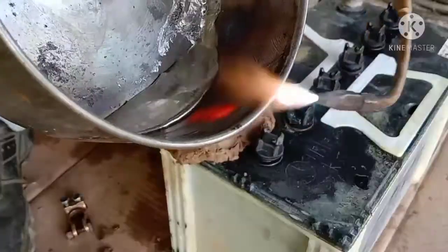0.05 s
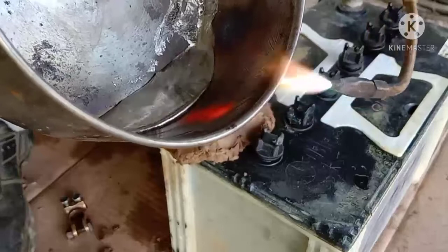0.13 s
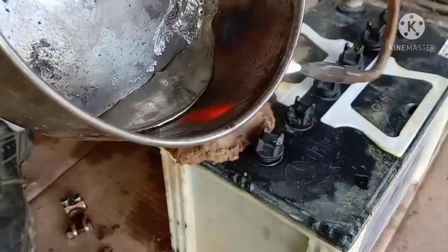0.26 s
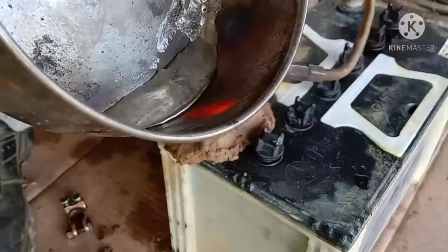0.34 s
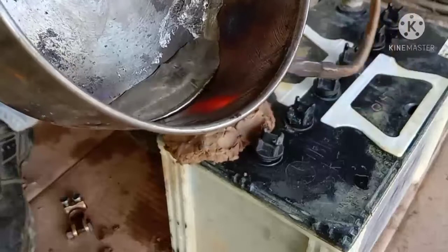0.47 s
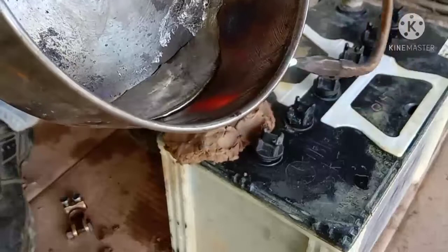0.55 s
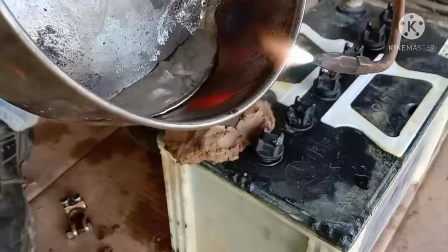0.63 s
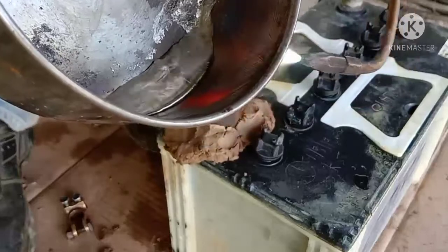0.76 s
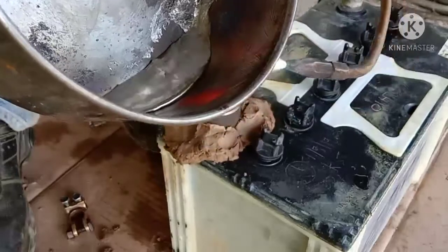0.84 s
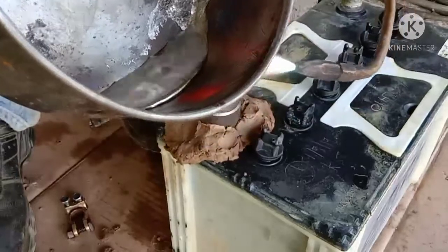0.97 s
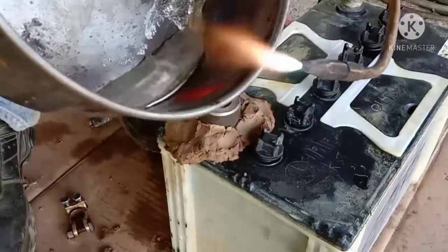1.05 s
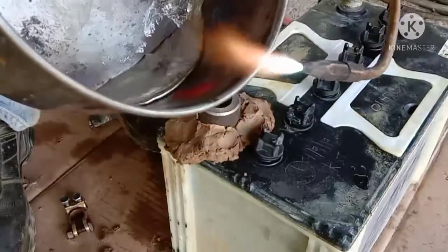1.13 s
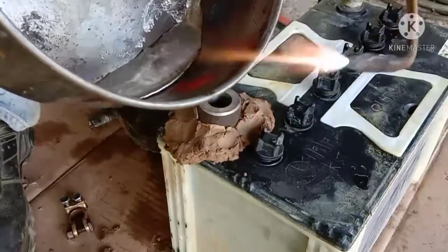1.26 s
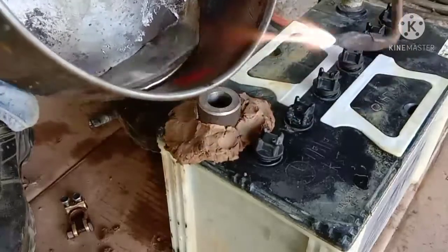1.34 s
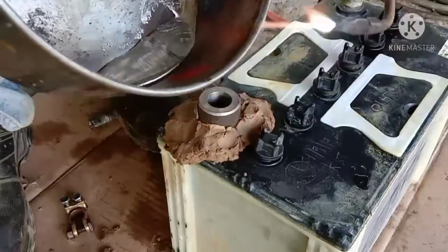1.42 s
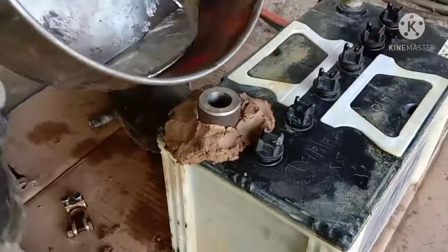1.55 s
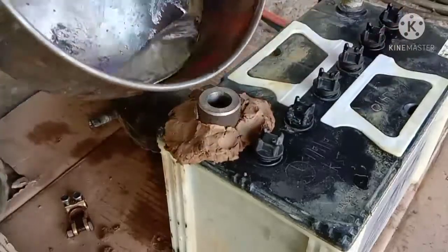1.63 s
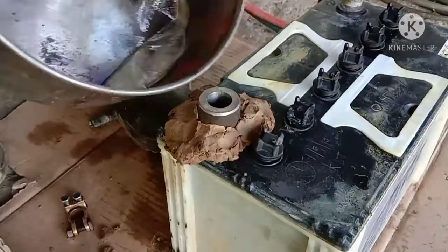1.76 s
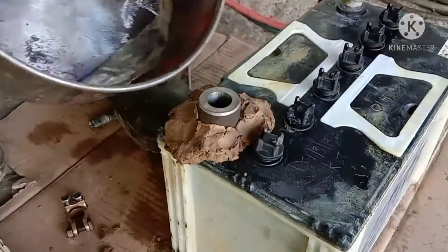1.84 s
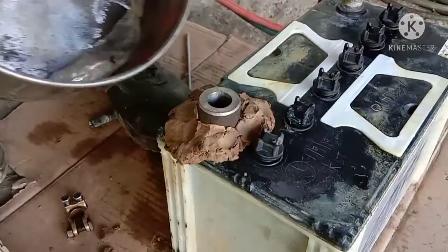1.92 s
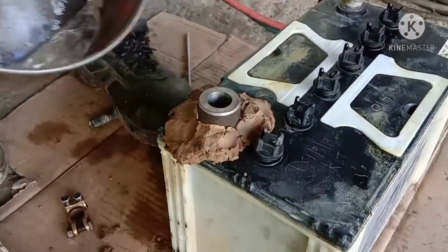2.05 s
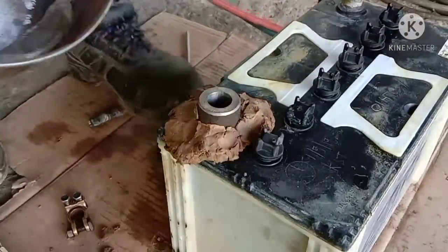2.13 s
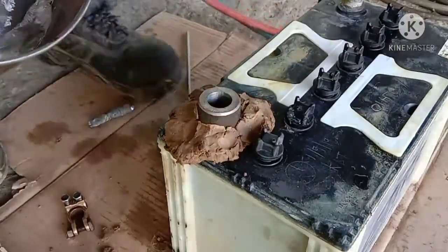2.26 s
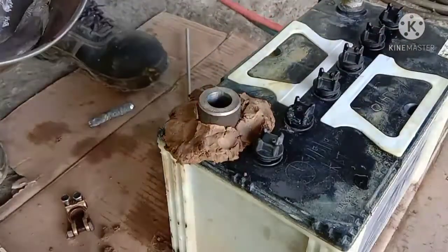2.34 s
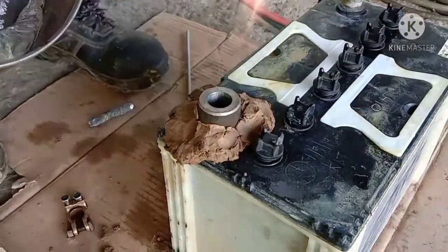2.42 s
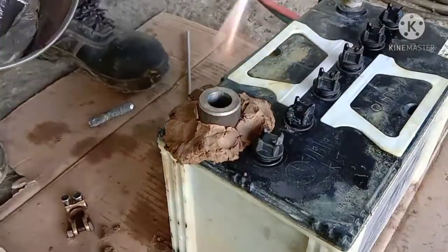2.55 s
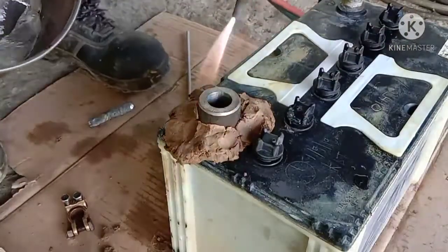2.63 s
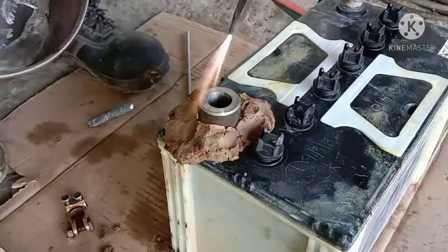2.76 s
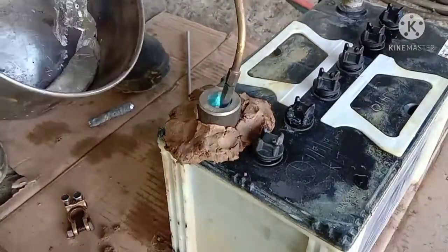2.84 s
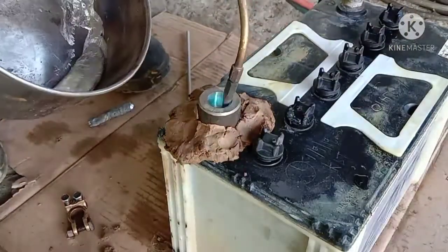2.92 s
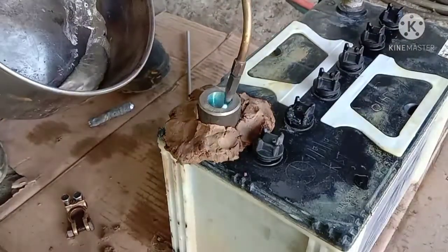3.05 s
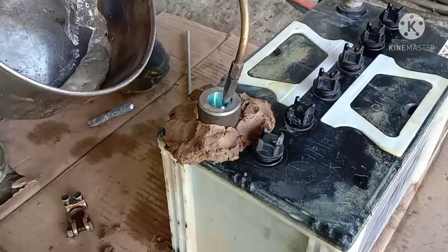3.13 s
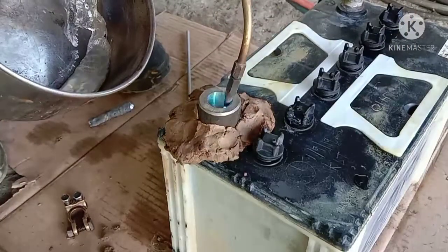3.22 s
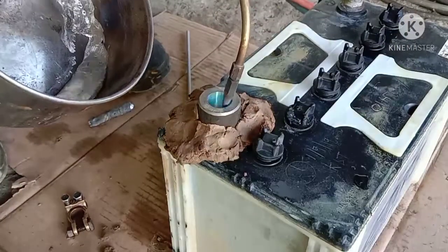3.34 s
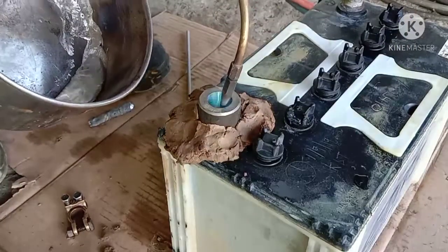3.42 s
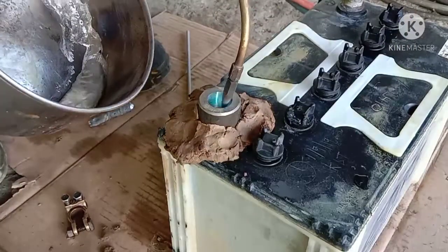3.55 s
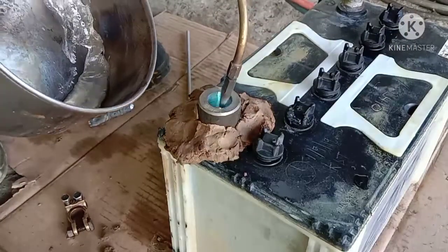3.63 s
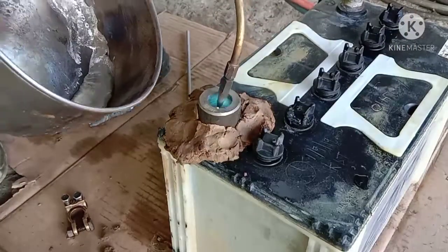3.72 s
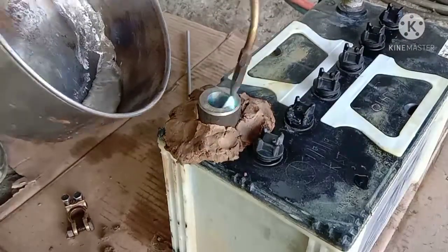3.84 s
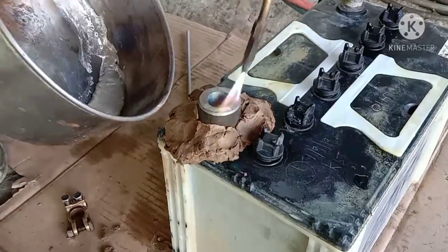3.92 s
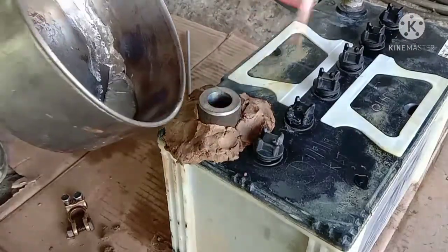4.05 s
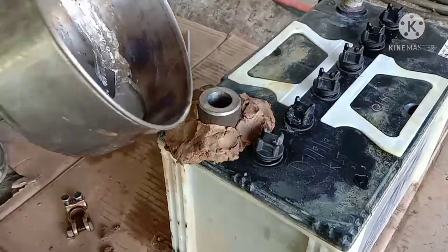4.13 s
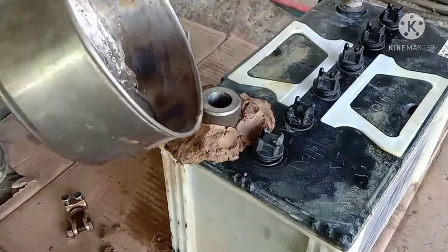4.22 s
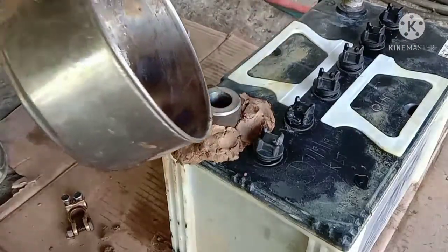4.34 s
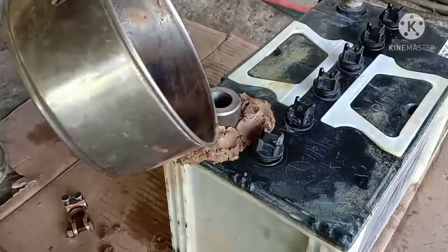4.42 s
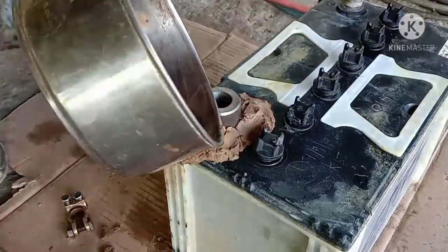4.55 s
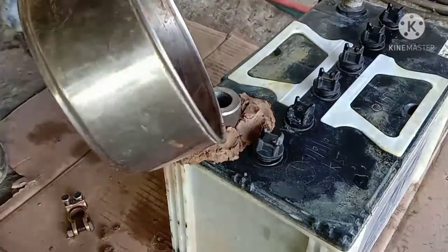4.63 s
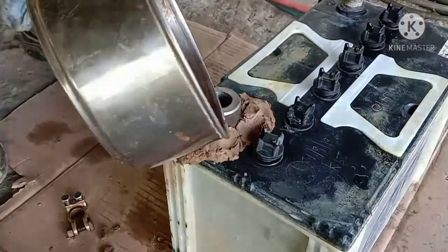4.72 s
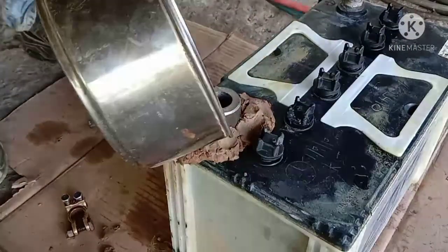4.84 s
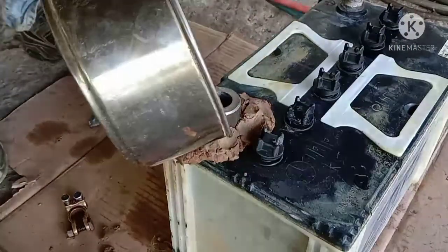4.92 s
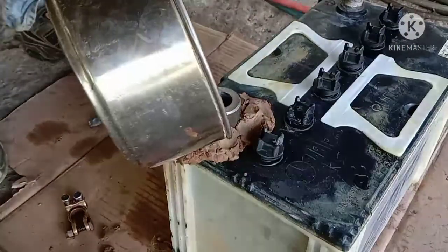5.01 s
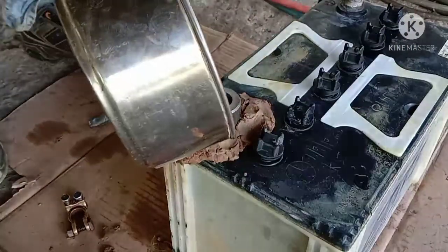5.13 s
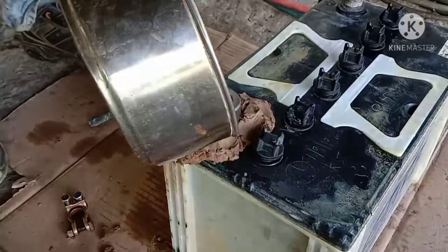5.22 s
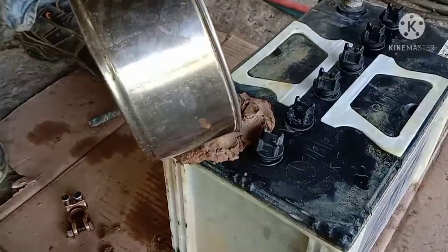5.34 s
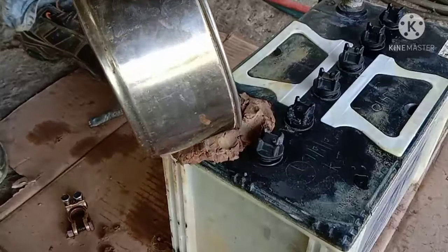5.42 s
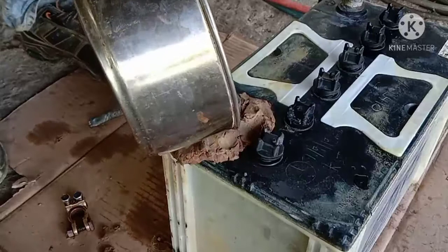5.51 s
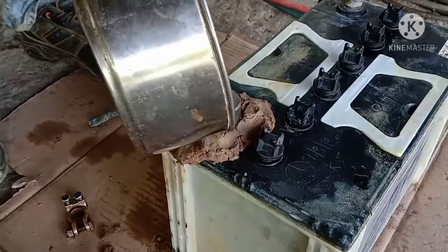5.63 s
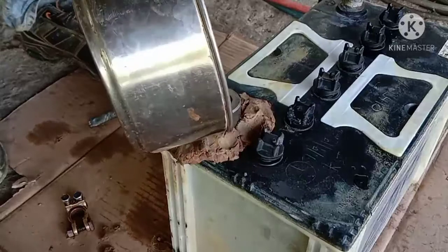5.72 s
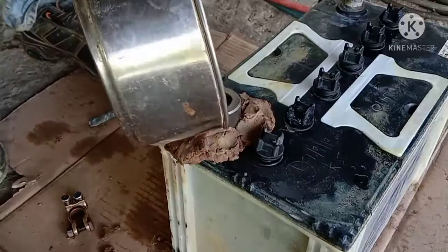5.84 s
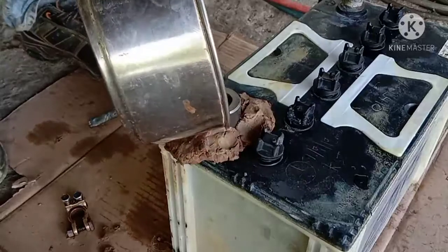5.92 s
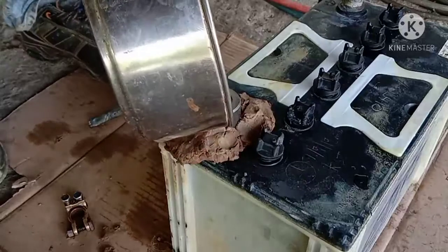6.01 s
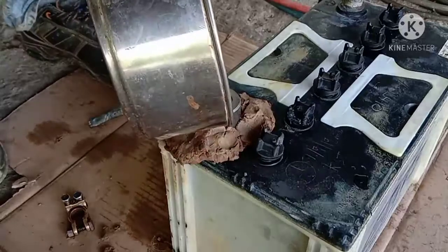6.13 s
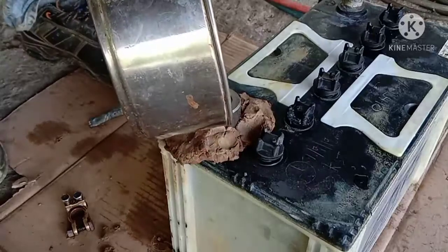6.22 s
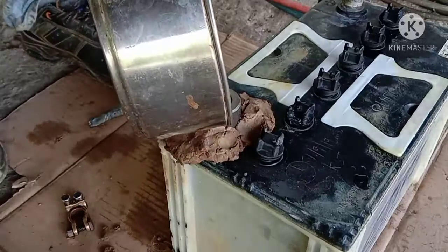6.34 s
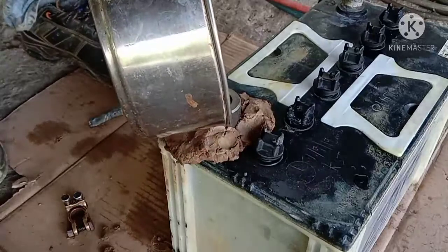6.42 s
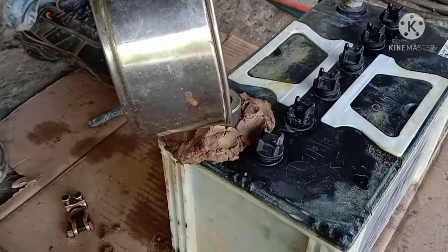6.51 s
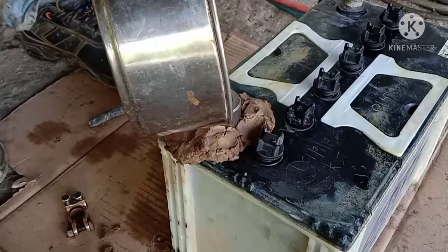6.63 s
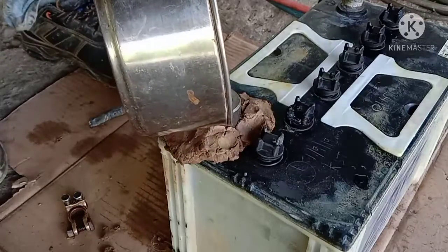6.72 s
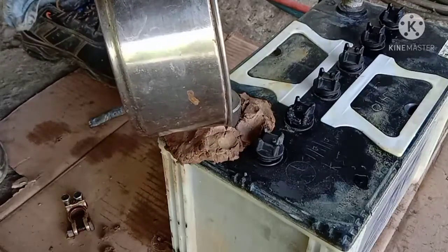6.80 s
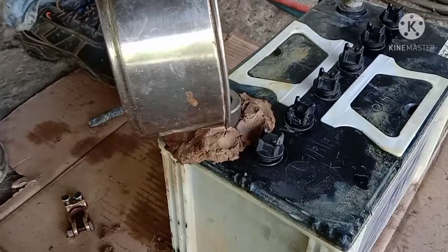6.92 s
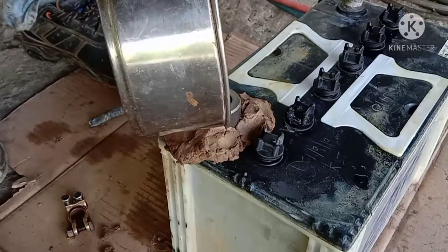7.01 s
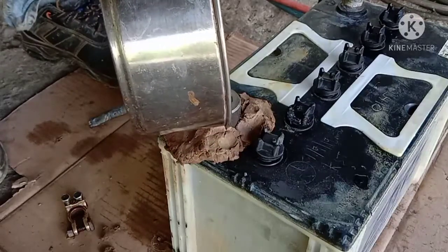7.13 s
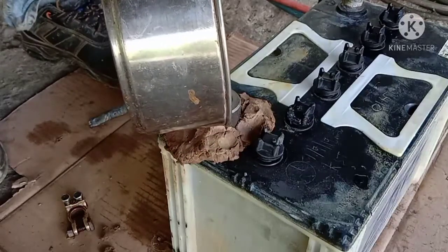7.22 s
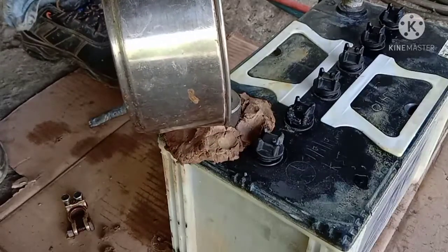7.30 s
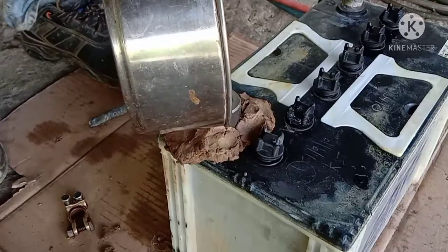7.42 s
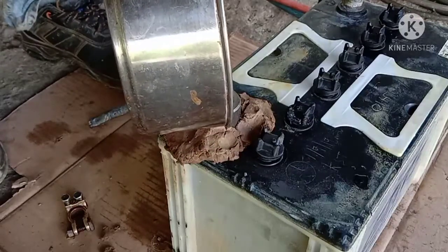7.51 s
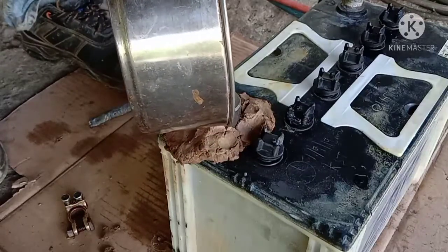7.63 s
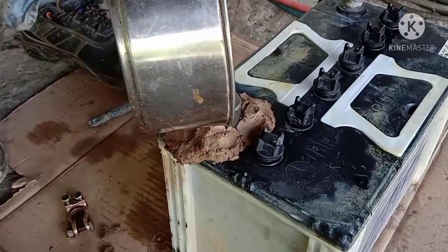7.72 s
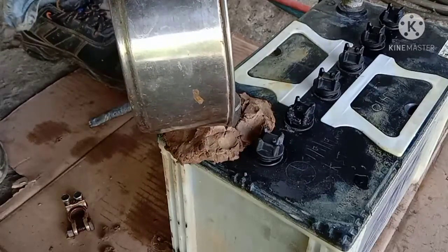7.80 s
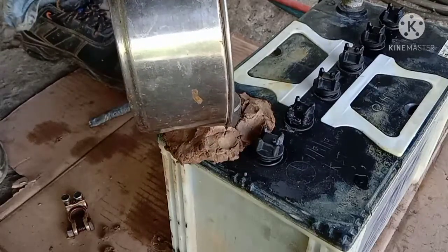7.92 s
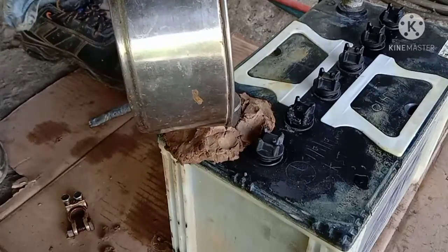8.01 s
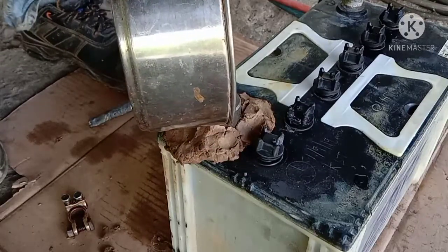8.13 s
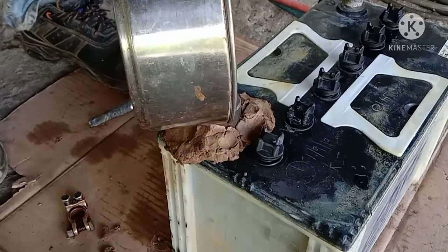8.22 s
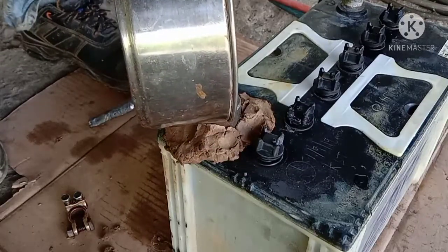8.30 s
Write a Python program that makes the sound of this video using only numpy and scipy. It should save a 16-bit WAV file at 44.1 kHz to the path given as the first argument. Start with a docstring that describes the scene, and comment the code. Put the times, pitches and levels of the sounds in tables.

```python
"""A gas torch hisses close by, its jet coloured by nozzle resonances and combed by moving echoes.
The flame licks a steel pot of molten lead with a low flapping roar; something knocks on the floor;
then the flame roars and sputters inside a small steel mould. The torch is drawn back and hisses on
behind the pot while the lead runs silently. Friction on the tilted pot gives one thin, broken squeal."""
import sys
import numpy as np
from scipy import signal
from scipy.fft import rfft, irfft, next_fast_len
from scipy.io import wavfile
from scipy.ndimage import uniform_filter1d

SR = 44100
rng = np.random.default_rng(int(sys.argv[2]) if len(sys.argv) > 2 else 0)


def store_pcm(level_fs):
    """Save levels as 16-bit WAV."""
    pcm = np.round(np.clip(level_fs, -1, 1) * 32767).astype(np.int16)
    wavfile.write(sys.argv[1], SR, np.atleast_2d(pcm).T)


N = 368676
FRAME, HOP = 1024, 256
TIME = np.arange(N) / SR
FRAME_S = np.arange(N // HOP + 5)[:, None] * HOP / SR
BIN_HZ = np.fft.rfftfreq(FRAME, 1 / SR)
DIP_S, LIFT_S = 3.07, 3.92  # nozzle into, out of the mould

# surges in the mould: t/s, sigma/s, level lift/dB, resonance f/Hz, resonance lift/dB
SURGES = [(3.08, 0.039, 1.5, 2230, 7.5), (3.274, 0.027, 4.5, 1960, 10.5), (3.439, 0.013, 6, 2260, 15),
          (3.546, 0.03, 1.5, 2920, 7), (3.664, 0.028, 5.5, 2300, 5.5), (3.883, .032, 11.5, 3140, 9)]
# pot tipped to pour: t/s, tilt/0-1
TILT = [(4.3, 0.05), (4.7, 0.24), (5.05, 0.17), (5.6, 0.69), (6.1, .78), (7.2, 0.86), (7.8, 0.84),
        (8.36, 0.86)]


def jet():
    """Gas hisses through the nozzle's resonances over the flame's rush; echoes notch both."""
    # jet spectrum: f/Hz, level/dB
    gas_colour = [(150, -24), (450, -22.5), (1000, -20), (1600, -20.5), (2500, -9.5), (3300, -7.5),
                  (5000, -7), (7000, -8.5), (8300, -0.5), (9400, -11.5), (10500, -10.5), (12500, -0.5),
                  (14500, -13), (15500, -9)]
    # nozzle resonances: f/Hz, sigma/Hz, lift/dB
    nozzle = [(1463, 278, 19.5), (2398, 194, 15), (3356, 250, 13.5), (4436, 160, 8.5), (5466, 240, 15),
              (6507, 286, 10.5), (7627, 316, 9.5), (8660, 87, 9), (10005, 140, 11), (11080, 220, 9),
              (11850, 150, 7.5), (12630, 91, 6.5), (14030, 150, -16), (14100, 550, 14)]
    # flame rush near a surface: t/s, level/dB on the jet's scale, f/Hz
    rush = [(0, 1.5, 1970), (1.05, -1, 1820), (1.45, 5, 1830), (1.95, 6, 1500), (2.45, 7, 1350),
            (2.7, -12, 1490), (3.1, 8.5, 1614), (3.97, 8, 1660), (4.15, -5, 1700), (4.4, -13, 2400),
            (5.2, -7, 2520), (5.8, -30, 2000)]
    t = FRAME_S
    # resonances sharpen once the torch is still
    moving_db, still_db = (sum(db * bell(BIN_HZ, hz, sigma * (1 - narrowing)) for hz, sigma, db in nozzle)
                           for narrowing in (0, 0.22))
    gas_db = spectrum_db(gas_colour, BIN_HZ) + moving_db + (still_db - moving_db) * screened(t)
    gas_db += brightness(t) * spectrum_db([(8500, 0), (10500, 0.86)], BIN_HZ)
    rush_db, rush_hz = follow(rush, t)
    rush_db -= 0.95 * swing_db(t)  # the rush is not beamed
    rush_power = gain_of(rush_db) ** 2 * band(rush_hz, octaves=0.28)
    field_db = 10 * np.log10(gain_of(gas_db) ** 2 + rush_power)
    field_db = field_db + echoes_db() + screen_db() + scatter_db(depth_db=1.7)
    hiss = turbulence(field_db, band_hz=(7000, 9000), eddy_db=1.42)
    level_db = -44 + swing_db(TIME) - 1.65 * screened(TIME)
    waver = flutter(rate_hz=9.3, depth_db=0.5) ** (1 - screened(TIME))
    return hiss * gain_of(level_db) * waver


def swing_db(t):
    """Hiss lift as the nozzle swings toward (+) or away from (-) the listener."""
    # t/s, sigma/s, lift/dB
    swings = [(0.283, .085, 7.5), (0.548, 0.066, -3), (0.818, 0.048, 4), (1.24, 0.087, 5), (1.497, 0.12, 6),
              (2.38, 0.15, 1.5), (4.206, 0.11, 3.5)]
    return sum(db * bell(t, s, sigma) for s, sigma, db in swings)


def brightness(t):
    """The beamed treble follows the swings, flickers in transit and dulls inside the mould."""
    carry_s, arrive_s, period_s = 2.505, 2.94, 0.087
    flicker = 2.8 + 3.2 * np.cos(2 * np.pi * (t - carry_s) / period_s)
    carried = during(t, carry_s, arrive_s, period_s / 2, period_s / 2)
    dipped = during(t, DIP_S, LIFT_S, fade_in_s=0.06, fade_out_s=0.04)
    dulling = -11.5 - 0.47 * surge_db(t)  # deeper nozzle: louder roar, duller hiss
    resting = -1 + 0.1 * screened(t)
    return resting + 0.6 * swing_db(t) + flicker * carried + dulling * dipped


def echoes_db():
    """Echoes off the ground and the nearest surface comb the sound; delays shorten with pot tilt."""
    # ground echo, set by torch height: t/s, untilted delay/ms
    ground_path = [(0, 1.09), (1.65, 1.09), (1.9, 1.64), (2.2, 1.71), (2.66, 1.35), (2.92, 1.03),
                   (4.02, 1.03), (4.22, 1.31), (4.5, 1.28)]
    # echo off pot or mould: t/s, untilted delay/ms, facing/0-1
    near_path = [(0, .42, .9), (.1, .52, .7), (.22, .5, .1), (.38, .49, .7), (.55, .42, .5), (.69, .53, .8),
                 (.88, .33, .6), (1.06, .57, .9), (1.3, .48, .15), (2.1, .77, .5), (2.35, .75, 0),
                 (2.55, .54, .55), (2.82, .165, 1), (2.92, .15, 0), (3.99, .1, 0), (4.05, .115, .9),
                 (4.13, .175, 1), (4.25, .34, .5), (4.45, .45, .45)]
    t = FRAME_S
    tilt, = follow(TILT, t)
    ground_ms, = follow(ground_path, t)
    near_ms, facing = follow(near_path, t)
    ground = (ground_ms - 0.39 * tilt, 0.32 - 0.16 * screened(t))
    near = (near_ms - 0.265 * tilt, 0.78 * facing)
    mirrored = gain_of(spectrum_db([(5000, 0), (8000, -5)], BIN_HZ))  # roughness scatters treble
    comb = 1
    for delay_ms, strength in (ground, near):
        comb = comb * (1 + strength * mirrored * np.exp(-2j * np.pi * BIN_HZ * delay_ms / 1000))
    return 20 * np.log10(abs(comb) + 1e-3)


def screened(t):
    """How far the pot stands in front of the torch, 0-1."""
    return np.clip((t - 4.62) / 0.42 + 1, 0, 1)


def screen_db():
    """The wave bent round the pot cancels the direct one in bands that shift with tilt."""
    # upright f/Hz, tilted f/Hz, depth/dB, upright sigma/Hz, tilted sigma/Hz
    notches = [(1050, 1280, 5, 90, 110), (1900, 2700, 16, 95, 280), (2650, 3900, 17, 70, 115),
               (3620, 4700, 19, 140, 95), (4560, 5950, 8, 140, 110), (6200, 6030, 8, 90, 90)]
    tilt, = follow(TILT, FRAME_S)
    cut_db = sum(db * bell(BIN_HZ, hz + (tilted_hz - hz) * tilt, sigma + (tilted_sigma - sigma) * tilt)
                 for hz, tilted_hz, db, sigma, tilted_sigma in notches)
    return -screened(FRAME_S) * cut_db


def scatter_db(depth_db):
    """Many weak reflections ripple the spectrum and drift as the hand moves."""
    ripple = rng.standard_normal((len(FRAME_S), len(BIN_HZ)))
    ripple = uniform_filter1d(uniform_filter1d(ripple, size=30, axis=0), size=15, axis=0)
    return depth_db * evened(uniform_filter1d(ripple, size=5, axis=1))


def mould_roar():
    """The flame roars in the mould: hollow at each pass of the rim, surging in falling resonances."""
    # f/Hz, level/dB
    colour = [(200, -18), (500, -43), (850, -1.5), (1400, -14.5), (2400, 6.5), (3400, 7), (4600, 3.5),
              (5800, 0), (7000, -7), (9000, -23), (12000, -25.5)]
    rim_s, circle_s, sag_octaves_per_s = 3.09, 0.215, 10
    t = FRAME_S
    at_rim = np.cos(2 * np.pi * (t - rim_s) / circle_s)  # the hand circles the nozzle
    field_db = spectrum_db(colour, BIN_HZ) + 4.5 * band(4550, octaves=0.09) + echoes_db()
    field_db += 6 * at_rim * band(950, octaves=0.6)
    for s, sigma, _, hz, resonance_db in SURGES:
        gliding_hz = hz * 2 ** (sag_octaves_per_s * (s - t))
        field_db += resonance_db * bell(t, s, sigma) * band(gliding_hz, octaves=0.21)
    roar = turbulence(field_db, band_hz=(1800, 5000), eddy_db=3.5)
    level_db = -35.5 + held_db(DIP_S - 0.061, LIFT_S + 0.04, rise_db_per_s=113, fall_db_per_s=248)
    return roar * gain_of(level_db + surge_db(TIME)) * flutter(rate_hz=200, depth_db=1.1)


def surge_db(t):
    """Level lift of the roar in the mould."""
    return sum(db * bell(t, s, sigma) for s, sigma, db, _, _ in SURGES)


def flame_licks():
    """Where the flame meets metal it turns turbulent and flaps with a low roar."""
    # t/s, hold/s, level/dB, decay/(dB/s)
    licks = [(0.165, 0.17, -42, 600), (0.807, 0.032, -51, 330), (1.138, .95, -43, 70),
             (2.25, 0.26, -47, 38), (2.702, 0.2, -53, 136), (3.156, 0.015, -56.5, 350),
             (3.266, 0.061, -58, 247), (3.496, 0.032, -50, 400), (3.72, 0.021, -62, 350),
             (3.96, 0.026, -48.5, 300), (4.026, 0.042, -44.5, 88)]
    # f/Hz, level/dB
    colour = [(40, -49), (130, -15.5), (250, -3.5), (420, 5.5), (650, 3), (950, 0.5), (1200, -12),
              (2000, -22.5), (4000, -24)]
    rise_db_per_s, sag_db_per_s = 480, 4
    each_db = [db + held_db(s, s + hold, rise_db_per_s, fall) - sag_db_per_s * np.maximum(TIME - s, 0)
               for s, hold, db, fall in licks]
    roar = turbulence(spectrum_db(colour, BIN_HZ) + echoes_db(), band_hz=(200, 700), eddy_db=4.0)
    return roar * gain_of(np.max(each_db, axis=0)) * flutter(rate_hz=52, depth_db=0.5)


def sputters():
    """The flame sputters in the mould in short, rough bursts."""
    # t/s, level/dB, sigma/s
    bursts = [(3.474, -30.5, 0.0059), (3.495, -29.5, 0.011), (3.528, -27.5, 0.0088), (3.74, -33.5, 0.0074),
              (3.958, -32, 0.015)]
    # f/Hz, level/dB
    colour = [(80, -19), (300, -59), (800, 2), (2500, -1.5), (5200, 1.5), (7600, -4.5), (9500, -22),
              (15000, -23)]
    return coloured(colour) * bumps(bursts) * flutter(rate_hz=230, depth_db=3.0)


def floor_knocks():
    """Each knock is a damped thud, a burst of clatter and the short ring of a board."""
    # t/s, thud level/dB, thud f/Hz, clatter level/dB, clatter t60/s
    knocks = [(1.861, -34.5, 260, -31.5, 0.09), (2.288, -28, 1210, -31, 0.066),
              (2.3876, -19, 380, -21, 0.1), (2.4127, -16, 1330, -30.5, 0.17), (2.48, -18, 1080, -39, 0.014)]
    # f/Hz, level/dB
    clatter_colour = [(47, -39), (80, -16), (684, -6), (1110, -7.5), (1320, -6), (2180, -10.5), (3380, -9),
                      (3940, -19), (4910, -8), (7950, -17), (9270, -22.5), (15000, -23)]
    # board modes: nominal f/Hz, relative level/dB, t60/s
    board = [(345, 2, 0.31), (514, -12, 0.11), (963, 1, 0.42), (1276, 0.5, 0.65), (1680, 0, 0.11)]
    thud_t60_s, attack_s = 0.02, 0.00072
    rattle = coloured(clatter_colour) * flutter(rate_hz=420, depth_db=1.5)
    out, t = np.zeros(N), TIME[:SR // 2]
    for s, thud_db, thud_hz, clatter_db, clatter_t60_s in knocks:
        span = slice(round(s * SR), round(s * SR) + len(t))
        thud = np.sin(2 * np.pi * thud_hz * t) * gain_of(thud_db - 60 * t / thud_t60_s)
        ring = sum(np.sin(2 * np.pi * hz * rng.uniform(0.91, 1.03) * t) * gain_of(db - 60 * t / t60_s)
                   for hz, db, t60_s in board)
        clatter = rattle[span] * gain_of(clatter_db - 60 * t / clatter_t60_s)
        out[span] += (thud + gain_of(thud_db - 30.5) * ring + clatter) * (1 - np.exp(-t / attack_s))
    # the knocks carry little below 130 Hz
    return signal.sosfilt(signal.butter(2, 130, "highpass", fs=SR, output="sos"), out)


def pot_squeal():
    """A nearly pure friction tone at the rim comes in squeaks; pitch sags as the pressure eases."""
    # t/s, level/dB, sigma/s
    squeaks = [(7.095, -44, 0.012), (7.135, -37, 0.011), (7.192, -38.5, .021), (7.275, -38.5, 0.014),
               (7.34, -48, 0.012), (7.41, -55.5, .06)]
    top_hz, hz_per_db = 3020, 3.1
    level = bumps(squeaks)
    hz = top_hz + hz_per_db * 20 * np.log10(level / level.max() + 0.0295)
    tone = np.sqrt(2) * np.sin(2 * np.pi * np.cumsum(hz) / SR)
    return tone * level * flutter(rate_hz=43, depth_db=0.5)


def pot_scrapes():
    """The pot scrapes faintly: brief swells of bright noise."""
    # t/s, level/dB, sigma/s
    scrapes = [(4.64, -52, 0.029), (7.41, -45, 0.046), (7.5, -50, 0.018), (7.73, -54, 0.047)]
    # f/Hz, level/dB
    colour = [(300, -38), (2400, -38), (3600, 6.5), (5500, 3.5), (7500, 0), (12000, -21)]
    return coloured(colour) * bumps(scrapes) * flutter(rate_hz=120, depth_db=1.0)


def yard_air():
    """Low buffets of air over the steady noise of a quiet yard."""
    # t/s, level/dB, sigma/s
    buffets = [(1.0, -55.5, 0.02), (1.84, -58, .025), (2.95, -63.5, 0.056), (3.15, -53, 0.013),
               (3.52, -56, 0.03), (3.63, -47, 0.012), (3.77, -53.5, 0.034), (4.08, -58, 0.084),
               (7.33, -62, .03), (7.46, -64, 0.07), (8.07, -67, 0.023), (8.24, -55, 0.02),
               (8.33, -47, 0.12)]
    # f/Hz, level/dB
    buffet_colour = [(20, -33), (65, 3.5), (120, -3.5), (220, -19.5), (500, -69), (2000, -70)]
    # f/Hz, level/dB
    yard_colour = [(20, -32), (70, 1.5), (200, 1.5), (400, -7), (800, 1.5), (1400, -27), (3000, -38),
                   (9000, -24.5)]
    return coloured(buffet_colour) * bumps(buffets) + gain_of(-72.5) * coloured(yard_colour)


def turbulence(field_db, band_hz, eddy_db):
    """Noise with a moving spectrum, levelled within band_hz, then roughened by random eddies."""
    real, imag, eddies = rng.standard_normal((3, len(FRAME_S), len(BIN_HZ)))
    in_band = (BIN_HZ > band_hz[0]) & (BIN_HZ < band_hz[1])
    magnitude = gain_of(field_db)
    magnitude /= np.sqrt((magnitude[:, in_band] ** 2).sum(1, keepdims=True))
    eddies = evened(uniform_filter1d(uniform_filter1d(eddies, size=4, axis=0), size=7, axis=1))
    frames = (real + 1j * imag) * magnitude * gain_of(eddy_db * eddies)
    return signal.istft(frames.T, nperseg=FRAME, noverlap=FRAME - HOP)[1][:N] / np.sqrt(4 / 3)


def coloured(colour):
    """Steady noise of rms 1 with the given spectrum."""
    size = next_fast_len(N)
    gain = gain_of(spectrum_db(colour, np.fft.rfftfreq(size, 1 / SR)))
    return evened(irfft(rfft(rng.standard_normal(size)) * gain, size)[:N])


def flutter(rate_hz, depth_db):
    """Random gain of mean power 1, varying up to about rate_hz."""
    wobble = signal.sosfilt(signal.butter(2, rate_hz, fs=SR, output="sos"), rng.standard_normal(N))
    return evened(gain_of(depth_db * evened(wobble)))


def spectrum_db(points, hz):
    """Levels interpolated over log frequency."""
    point_hz, db = np.transpose(points)
    return np.interp(np.log(hz + 1), np.log(point_hz + 1), db)


def follow(rows, t):
    """Each value column of a curve at times t."""
    s, *columns = np.transpose(rows)
    return [np.interp(t, s, column) for column in columns]


def held_db(start_s, end_s, rise_db_per_s, fall_db_per_s):
    """Envelope: rises to 0 dB at start_s, holds, falls after end_s."""
    return -rise_db_per_s * np.maximum(start_s - TIME, 0) - fall_db_per_s * np.maximum(TIME - end_s, 0)


def during(t, start_s, end_s, fade_in_s, fade_out_s):
    """1 from start_s to end_s, fading outside."""
    return np.clip(np.minimum((t - start_s) / fade_in_s, (end_s - t) / fade_out_s) + 1, 0, 1)


def bumps(rows):
    """Summed gain of short Gaussian events."""
    return sum(gain_of(db) * bell(TIME, s, sigma) for s, db, sigma in rows)


def band(hz, octaves):
    """Gaussian of height 1 over log frequency."""
    return bell(np.log2((BIN_HZ + 1) / hz), 0, octaves)


def bell(x, centre, sigma):
    """Gaussian of height 1."""
    return np.exp(-0.5 * ((x - centre) / sigma) ** 2)


def gain_of(db):
    """dB to amplitude."""
    return 10 ** (np.asarray(db) / 20)


def evened(x):
    """Scaled to rms 1."""
    return x / np.sqrt(np.mean(x ** 2) + 1e-20)


def scene():
    """Torch, handling sounds and yard, the same in both channels."""
    mono = sputters() + pot_scrapes() + yard_air()
    mono += jet() + flame_licks() + mould_roar() + floor_knocks() + pot_squeal()
    return np.array([mono, mono])


def record(dry):
    """Steep low-pass at 15550 Hz."""
    lowpass = signal.firwin(1023, 15550, window=("kaiser", 9), fs=SR)
    return signal.oaconvolve(dry, lowpass[None], "same")


dry = scene()
out = record(dry)
store_pcm(out)
```